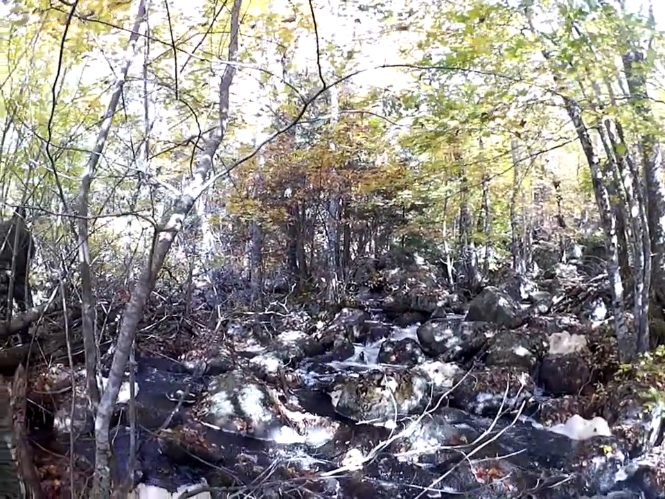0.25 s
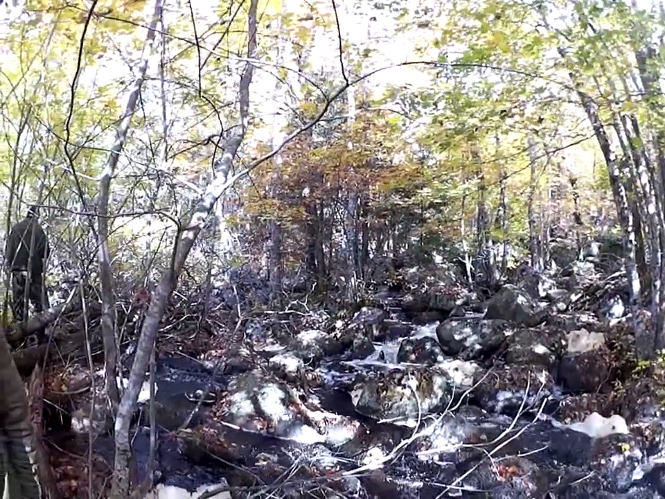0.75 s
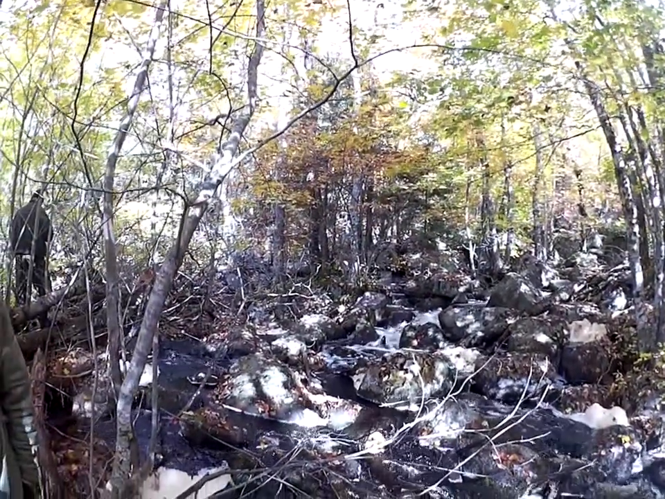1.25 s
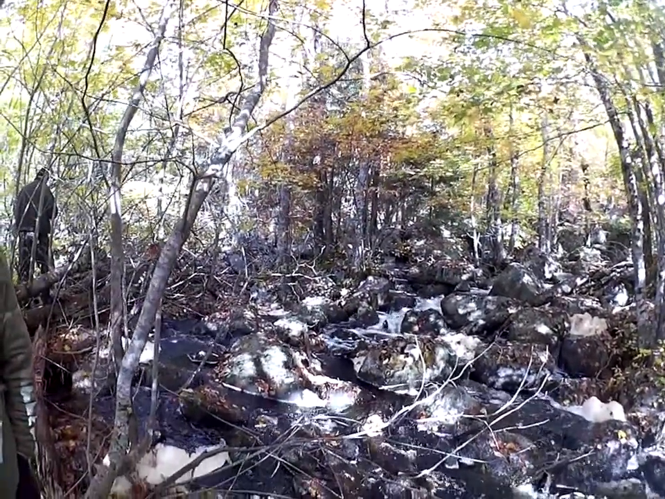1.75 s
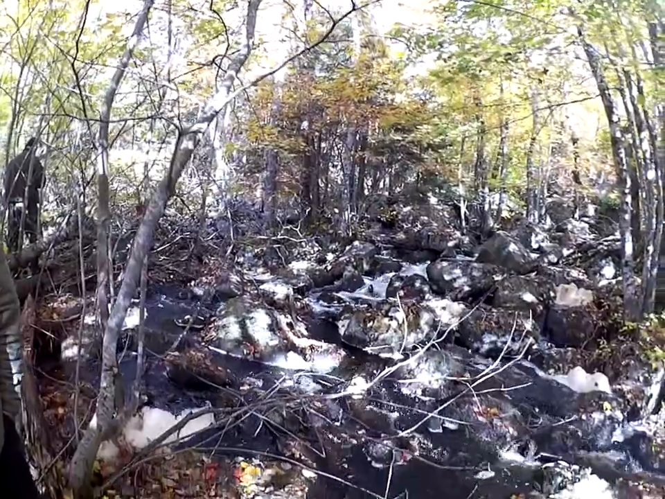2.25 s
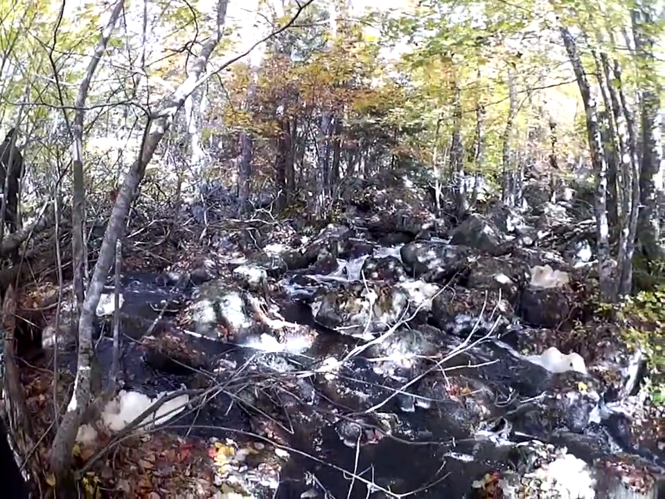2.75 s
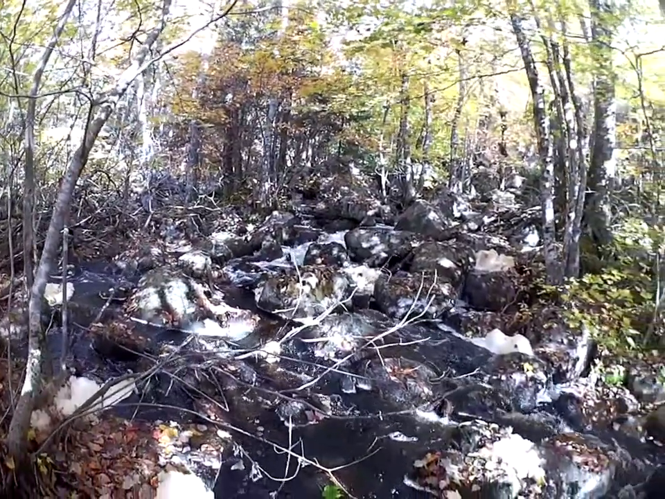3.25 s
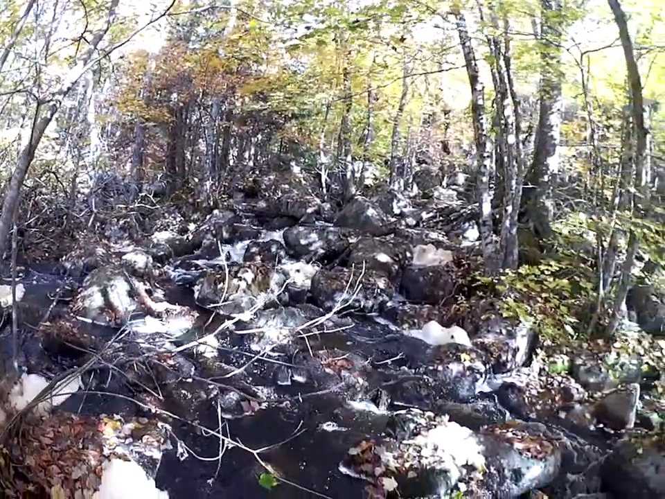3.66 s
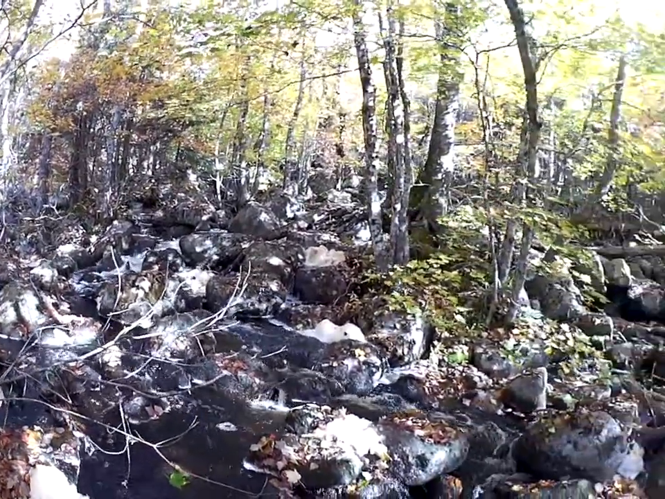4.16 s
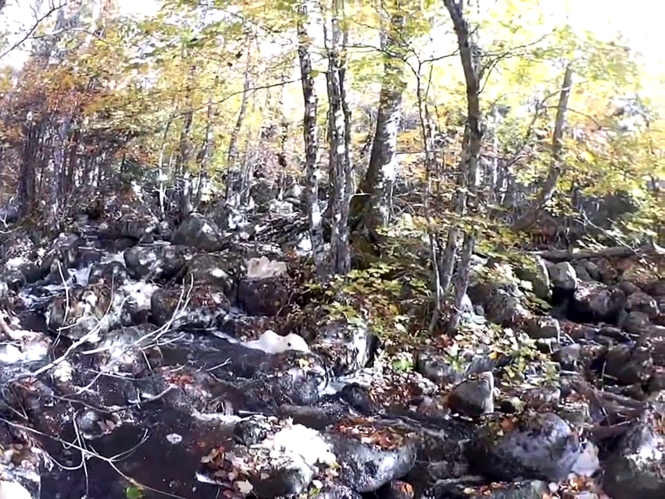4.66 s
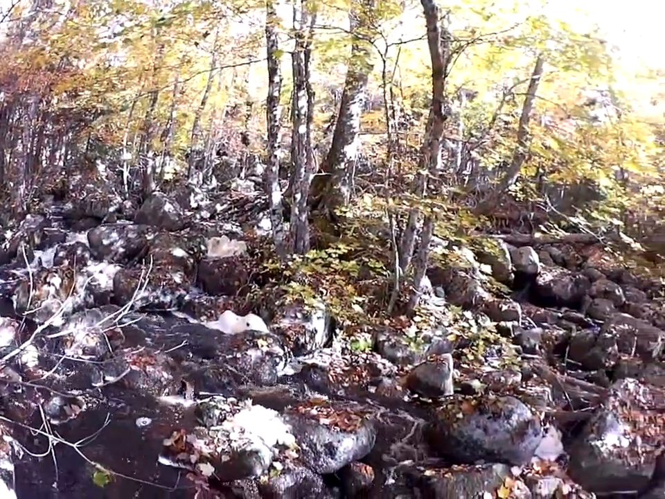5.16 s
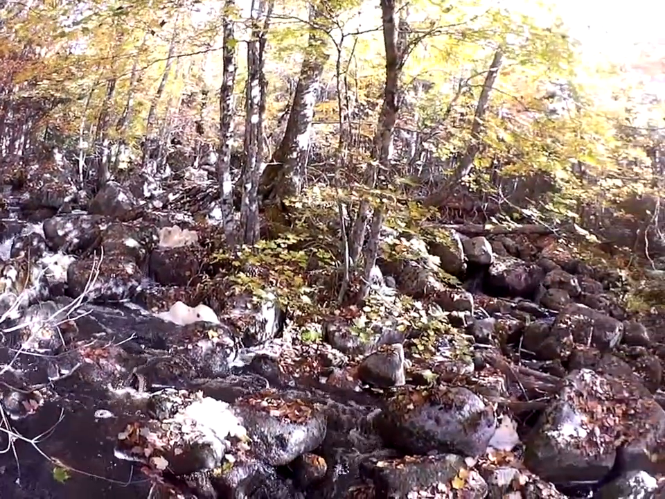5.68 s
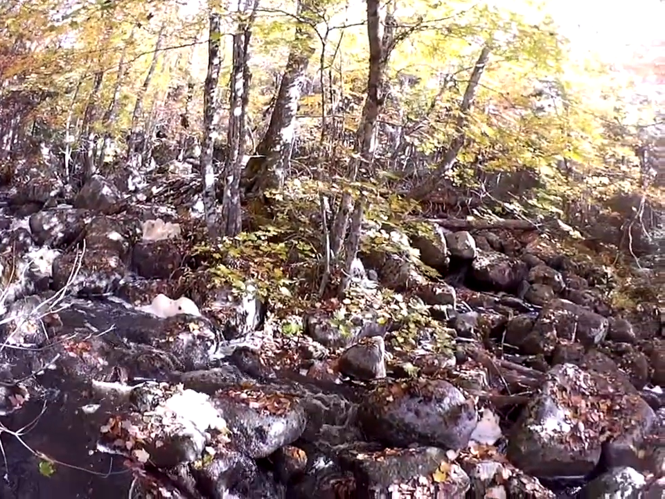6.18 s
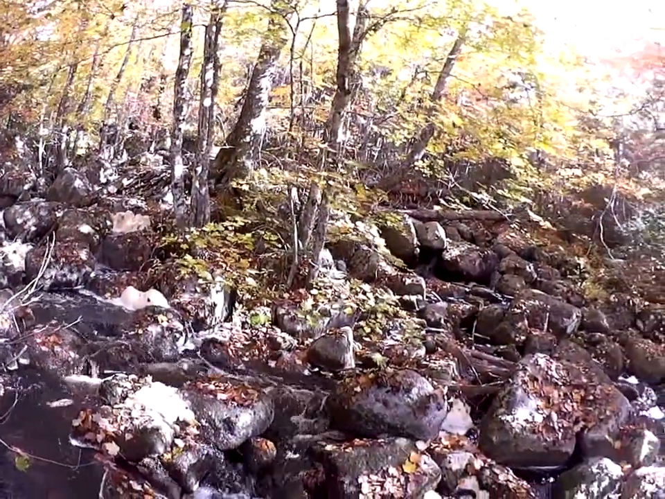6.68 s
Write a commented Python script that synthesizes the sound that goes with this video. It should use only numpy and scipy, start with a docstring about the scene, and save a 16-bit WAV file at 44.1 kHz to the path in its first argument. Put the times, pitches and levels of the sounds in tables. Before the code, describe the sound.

Steady stream water pours over stones without a break, dense and lively rather than deep. Over the rush come quick bubbling gurgles, wet plops and short smacks of nearby drops. Two closely spaced microphones turn slowly right, so the water shifts subtly leftward. Around the middle it opens up, its spray turns crisper and a short reflection makes it slightly hollow, then it clears again.

```python
"""In a wood, on the bank of a small brook, water cascades over boulders.
Countless far bubbles merge into an even rush of banded noise; splashes lift its middle, spray its treble.
Nearer bubbles, drops and flecks of spray are dying sines: a gurgle, smacks, plops, glugs and faint ticks.
The listener turns slowly to the right, holding two closely spaced microphones behind resonant ports,
so the cascade drifts leftward, and a short echo hollows the sound for a moment."""
import sys
import numpy as np
from scipy import signal
from scipy.fft import rfft, irfft, next_fast_len
from scipy.io import wavfile
from scipy.ndimage import map_coordinates

SR = 44100
rng = np.random.default_rng(int(sys.argv[2]) if len(sys.argv) > 2 else 0)


def output_pcm(signal):
    """Save a mono or channel-first signal as 16-bit PCM at the path in sys.argv[1].

    Samples are clipped to [-1, 1] before scaling.
    """
    pcm = np.clip(np.atleast_2d(signal).T, -1, 1) * 32767
    wavfile.write(sys.argv[1], SR, np.round(pcm).astype(np.int16))


N = 305172
TIME = np.arange(N) / SR

# Spectrum of the cascade's merged rush, before its layer trim: f/Hz, level/dB per Hz
RUSH_SPECTRUM = [(50, -109), (75, -84), (118, -75), (165, -77), (215, -74.5), (280, -76.5), (400, -74),
                 (650, -72), (1000, -70), (1700, -71), (2330, -72.7), (2650, -75.5), (3000, -76.5),
                 (4000, -83.5), (5400, -89), (6400, -86.5), (8300, -79.5), (12000, -87)]
# How alike the rush is at the two ports: f/Hz, correlation/1
PORT_LIKENESS = [(40, 0.97), (200, 1), (500, 0.95), (1000, 0.9), (2200, 0.81), (3000, 0.69), (4000, 0.68),
                 (6000, 0.17), (12000, 0.18)]
# How strongly a splash lifts each part of the rush: f/Hz, share/1
SPLASH_REACH = [(300, 0), (700, 0.9), (2400, 0.37), (4000, 0.64), (8000, 0.2)]
# Flecks of spray ticking on stone, before the layer trim: t/s, peak level/dB, f/Hz
SPRAY_TICKS = [(0.6404, -49, 5070), (3.1103, -49, 6460), (4.0744, -49, 7610), (6.735, -43, 7420)]
# Large near bubbles, from dull plop to ringing glug, before the layer trim:
# t/s, peak level/dB, f/Hz, ring/cycles
NEAR_GLUGS = [(0.246, -23, 970, 24), (0.4262, -23, 740, 15), (0.441, -25, 1060, 36), (1.349, -29, 1030, 26),
              (1.533, -29, 540, 22), (1.946, -28.5, 690, 18), (4.017, -23, 1290, 25), (4.132, -22, 880, 13),
              (4.8698, -19, 960, 11), (4.887, -22, 1110, 46), (5.4418, -25, 960, 11),
              (5.449, -24.5, 1080, 46), (6.203, -31.5, 620, 26), (6.286, -23, 900, 49),
              (6.379, -26, 1080, 24)]
# Near drops smacking on the water, before the layer trim: t/s, peak level/dB, f/Hz
DROP_SMACKS = [(0.356, -17, 2180), (1.0593, -15.5, 2330), (1.196, -13.5, 2350), (1.731, -12, 1830),
               (2.141, -15, 2300), (3.1337, -17, 2200), (3.2957, -15.5, 2180), (3.4008, -19, 2450),
               (3.723, -17, 2320), (3.8914, -18.5, 2280), (4.173, -17, 2120), (4.4524, -10.5, 1900),
               (4.695, -17, 1900), (4.892, -23, 2400), (5.451, -19, 2400), (5.634, -13.5, 2230),
               (5.9395, -16, 2230), (6.0706, -14.5, 2070), (6.3022, -21, 2340), (6.3238, -13.5, 1870)]
# Air resonances of each microphone port: f/Hz, width/Hz
LEFT_PORT_MODES = [(2315, 303), (8400, 1200)]
RIGHT_PORT_MODES = [(2420, 570), (9800, 1200)]
# Shape of the mismatch between the microphones, scaled separately for each port: f/Hz, level/dB
MIC_MISMATCH = [(100, -1), (500, -1), (1200, -1), (2300, -1.5), (4000, -0.5), (5400, 3.5), (6700, -1),
                (9000, 3), (12000, 2.2)]

PORT_SPACING_M, SOUND_SPEED_M_S = 0.064, 343
SHORT_RING_CYCLES = 16.4  # a smack or tick falls by 60 dB within this many cycles
# One smooth turn carries the cascade from right of centre (positive) to left of it
TURN_START_S, TURN_END_S = 1.66, 7.1
BEARING_BEFORE_DEG, BEARING_AFTER_DEG = 13.7, -15.5
# Early in the turn the splashing comes into the open and grows louder
OPEN_START_S, OPEN_END_S, OPEN_GAIN_DB = 2.1, 4.4, 1.36
# Midway, the spray brightens quickly in a narrow band
SIZZLE_START_S, SIZZLE_END_S, SIZZLE_BAND_HZ = 3.5, 4.15, (8100, 9100)
# Echo from a nearby surface: the delay is shortest and the echo strongest at the peak
ECHO_DELAY_S, ECHO_SHARE, ECHO_PEAK_S = 0.00254, 0.27, 4.39
ECHO_WIDTH_S, ECHO_PASS_S = 0.58, 1.58  # pace of its fade, pace of its delay
BODY_BAND_HZ, BODY_LOSS = (280, 435), 0.29  # band that thins meanwhile, share lost at the peak


def from_db(db):
    """Turn decibels into gain."""
    return 10 ** (np.asarray(db) / 20)


def at_hz(points, hz):
    """Read a spectrum on a log-frequency axis."""
    known_hz, values = np.transpose(points)
    return np.interp(np.log(np.maximum(hz, 1)), np.log(known_hz), values)


def butter(x, hz, kind, order):
    """Run a Butterworth filter."""
    return signal.sosfilt(signal.butter(order, hz, kind, fs=SR, output="sos"), x)


def delayed(x, seconds):
    """Read a signal late, by a delay that may glide."""
    return map_coordinates(x, [(TIME - seconds) * SR], order=3, mode="mirror")


def ease(start_s, end_s):
    """Move smoothly from 0 to 1 along half a cosine."""
    progress = np.clip((TIME - start_s) / (end_s - start_s), 0, 1)
    return (1 - np.cos(np.pi * progress)) / 2


def drift(rate_hz):
    """Wander at random with a spread of 1: noise through two equal poles at the given rate."""
    step = 40  # samples between points of the slow curve
    pole = np.exp(-2 * np.pi * rate_hz * step / SR)
    noise = rng.standard_normal(N // step + 2002)
    slow = signal.lfilter([1], [1, -2 * pole, pole * pole], noise)[2000:]  # skip the run-in
    return np.interp(np.arange(N) / step, np.arange(len(slow)), slow / slow.std())


def splashing(per_s, swell_db, attack_s, fade_s):
    """Water slops over stones at random moments: each splash swells fast and fades, in dB about the mean."""
    chance, strength = rng.random((2, N))
    age = TIME[:SR // 4]
    shape = (1 - np.exp(-age / attack_s)) * np.exp(-age / fade_s)
    hits = (chance < per_s / SR) * strength
    swell = swell_db * signal.fftconvolve(hits, shape)[:N]
    return swell - swell.mean()


def rush(level_db, churn_db, spray_db, splash_db):
    """Far bubbles merge into third-octave noise bands that swell singly; spray stirs the treble together."""
    edges = 22 * 2 ** (np.arange(29) / 3)
    white = rng.standard_normal((2, 2, N)) * np.sqrt(SR / 2)  # 0 dB per Hz
    out, spray = np.zeros((2, N)), drift(22)
    for k, (low, high) in enumerate(zip(edges, edges[1:])):
        # neighbouring bands draw on different noise
        mid, side = butter(white[k % 2], [low, high], "band", order=2)
        hz = np.sqrt(low * high)
        swell_db = churn_db * drift(24.0)
        swell_db = swell_db + spray_db * spray * min(hz / 4000, 1)
        swell_db = swell_db + splash_db * at_hz(SPLASH_REACH, hz)
        # mid and side are weighted to give the wanted correlation between the ports
        alike = np.clip(at_hz(PORT_LIKENESS, hz), 0, 1)
        pair = np.sqrt((1 + alike) / 2) * mid + np.sqrt((1 - alike) / 2) * side * [[1], [-1]]
        out += from_db(level_db + at_hz(RUSH_SPECTRUM, hz) + swell_db) * pair
    return out


def add_bubble(out, s, hz, peak_db, t60, lag, rise):
    """Add a dying sine whose pitch climbs by the share rise over t60; it reaches the left port later by lag."""
    start = int(np.clip(s * SR, 0, N - 1))
    length = min(int(t60 * SR) + 2, N - start)
    age = np.maximum(TIME[:length] - np.array([[lag], [-lag]]) / 2, 0)
    phase = 2 * np.pi * hz * age * (1 + rise * age / t60 / 2)
    fade = np.exp(-np.log(1000) * age / t60)
    out[:, start:start + length] += from_db(peak_db) * fade * np.sin(phase)


def scattered_bubbles(count, low_hz, high_hz, over_rush_db, spread_db, cycles, rise):
    """Single bubbles ring at random moments, pitches and places; with a spread, many faint and few strong."""
    out = np.zeros((2, N))
    for when, size, strength, damping, place in rng.random((count, 5)):
        hz = low_hz * (high_hz / low_hz) ** size
        rush_db = at_hz(RUSH_SPECTRUM, hz) + 10 * np.log10(hz)  # untrimmed rush around this pitch
        peak_db = rush_db + over_rush_db + spread_db * min(-np.log(1 - strength), 4)
        t60 = cycles * 2 ** (2 * damping - 1) / hz  # half to twice the nominal ring
        lag = (2 * place - 1) * PORT_SPACING_M / SOUND_SPEED_M_S
        add_bubble(out, when * N / SR, hz, peak_db, t60, lag, rise)
    return out


def near_bubbles(events, level_db, rise):
    """Near bubbles, drops and flecks ring at set moments, each fading over its own count of cycles."""
    out = np.zeros((2, N))
    for s, peak_db, hz, cycles in events:
        add_bubble(out, s, hz, peak_db + level_db, cycles / hz, 0, rise)
    return out


def hollow(water, thin_hz, dull_hz):
    """A dull, inverted echo swells and fades, its notches gliding up and back, while the low body thins."""
    passing = TIME - ECHO_PEAK_S
    nearness = 1 / (1 + (passing / ECHO_WIDTH_S) ** 2)
    delay = ECHO_DELAY_S * np.hypot(1, passing / ECHO_PASS_S)
    dull = butter(water, [thin_hz, dull_hz], "band", order=1)
    echo = np.array([delayed(channel, delay) for channel in dull])
    body = butter(water, BODY_BAND_HZ, "band", order=1)
    return water - ECHO_SHARE * nearness * echo - BODY_LOSS * nearness ** 2 * body


def turning(water, rumble_hz, shade_db_per_degree, hiss_hz, hiss_shade_db_per_degree, sizzle_db):
    """The cascade opens up and sizzles while the turn shifts its arrival time and level between the ports."""
    turn = ease(TURN_START_S, TURN_END_S)
    bearing = BEARING_BEFORE_DEG + (BEARING_AFTER_DEG - BEARING_BEFORE_DEG) * turn
    facing = (bearing - bearing.mean()) * [[-1], [1]]  # left, right
    opened = ease(OPEN_START_S, OPEN_END_S)
    open_gain = from_db(OPEN_GAIN_DB * (opened - opened.mean()))

    bright = ease(SIZZLE_START_S, SIZZLE_END_S)
    sizzle_gain = from_db(sizzle_db * (bright - bright.mean()))
    water = water + (sizzle_gain - 1) * butter(water, SIZZLE_BAND_HZ, "band", order=1)

    rumble = butter(water, rumble_hz, "low", order=1)
    hiss = butter(water - rumble, hiss_hz, "high", order=1)
    splash = water - rumble - hiss
    shaded_splash = splash * from_db(shade_db_per_degree * facing)
    shaded_hiss = hiss * from_db(hiss_shade_db_per_degree * facing)
    left, right = rumble + open_gain * (shaded_splash + shaded_hiss)
    lag = PORT_SPACING_M * np.sin(np.radians(bearing)) / SOUND_SPEED_M_S
    return np.array([delayed(left, lag / 2), delayed(right, -lag / 2)])


def scene():
    """Layer rush, gurgle, drops and spray with near smacks, glugs and ticks, heard while turning."""
    splash_db = splashing(per_s=45, swell_db=3.0, attack_s=0.003, fade_s=0.0093)
    bed = rush(level_db=-2.24, churn_db=0.82, spray_db=0.54, splash_db=splash_db)
    spray = scattered_bubbles(count=3000, low_hz=2950, high_hz=11460, over_rush_db=0.1,
                              spread_db=2.5, cycles=23.6, rise=0.05)
    gurgle = scattered_bubbles(count=1800, low_hz=641, high_hz=3030, over_rush_db=-4.8,
                               spread_db=3.0, cycles=25.0, rise=0.11)
    drops = scattered_bubbles(count=500, low_hz=1305, high_hz=3110, over_rush_db=2.5,
                              spread_db=0, cycles=13.5, rise=0)
    tick_events = [(*row, SHORT_RING_CYCLES) for row in SPRAY_TICKS]
    ticks = near_bubbles(tick_events, level_db=19, rise=0.05)
    glugs = near_bubbles(NEAR_GLUGS, level_db=-5.5, rise=0.064)
    smack_events = [(*row, SHORT_RING_CYCLES) for row in DROP_SMACKS]
    smacks = near_bubbles(smack_events, level_db=-12.0, rise=0.06)
    water = bed + spray + gurgle + drops + ticks + glugs + smacks
    hollowed = hollow(water, thin_hz=150, dull_hz=1400)
    return turning(hollowed, rumble_hz=450, shade_db_per_degree=0.0558,
                   hiss_hz=7000, hiss_shade_db_per_degree=0.0782, sizzle_db=1.5)


def port(x, modes, mismatch_scale):
    """Air in the port lifts the sound at each resonance and muffles what lies above."""
    size = next_fast_len(N + SR // 10)
    hz = np.arange(size // 2 + 1) * SR / size
    response = from_db(mismatch_scale * at_hz(MIC_MISMATCH, hz))
    for centre, width in modes:
        response = response / (1 - (hz / centre) ** 2 + 1j * hz * width / centre ** 2)
    return irfft(rfft(x, size) * response, size)[:N]


def record(dry):
    """Colour each side with its port, then cut the bass, notch the treble and close the top steeply."""
    left = port(dry[0], LEFT_PORT_MODES, 0.13)
    right = port(dry[1], RIGHT_PORT_MODES, -1.25)
    x = butter(np.array([left, right]), 118, "high", order=2)
    x = signal.lfilter(*signal.iirnotch(7950, 30, fs=SR), x)
    return butter(x, 14200, "low", order=14)


dry = scene()
out = record(dry)
output_pcm(out)
```